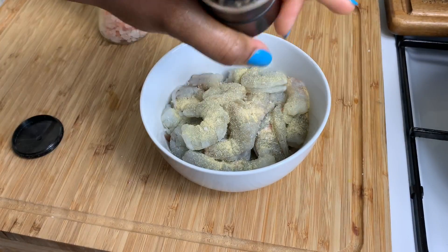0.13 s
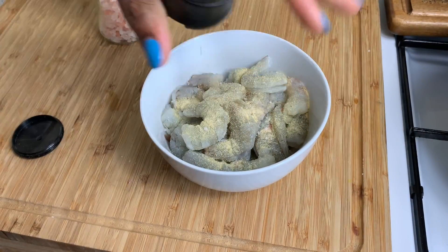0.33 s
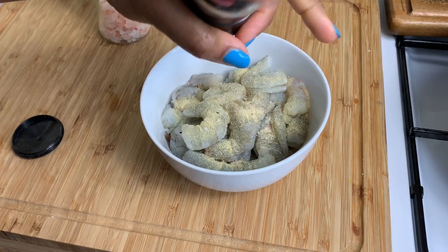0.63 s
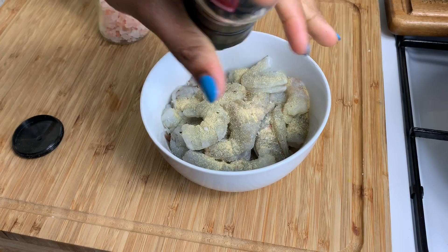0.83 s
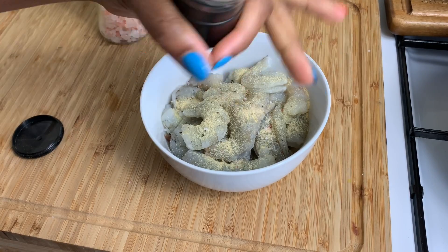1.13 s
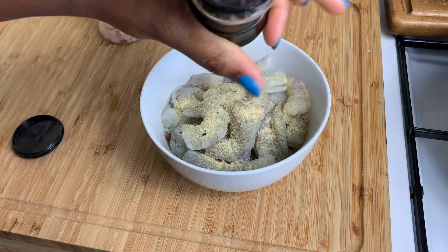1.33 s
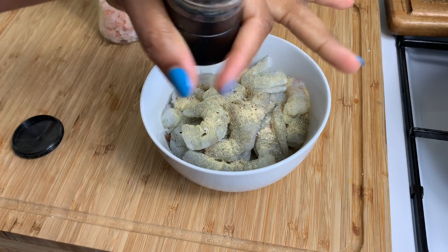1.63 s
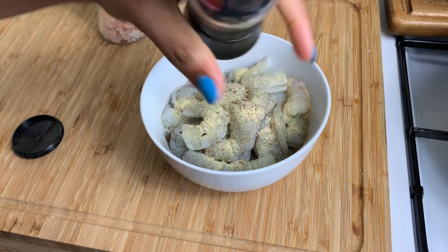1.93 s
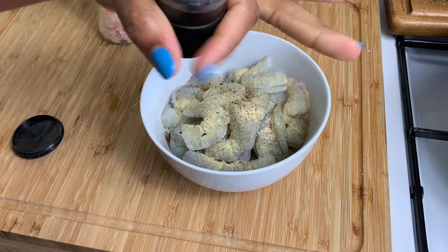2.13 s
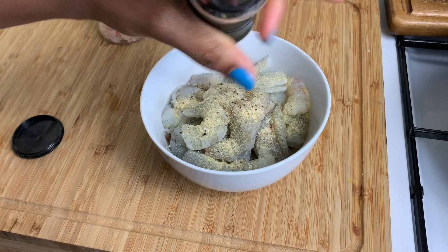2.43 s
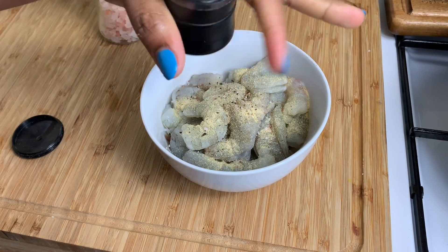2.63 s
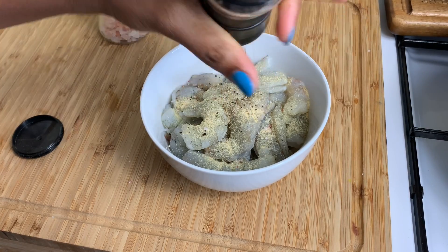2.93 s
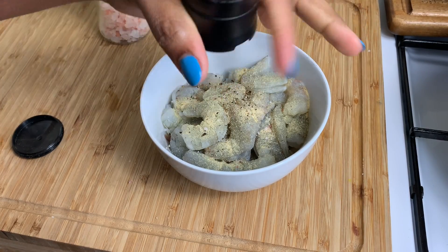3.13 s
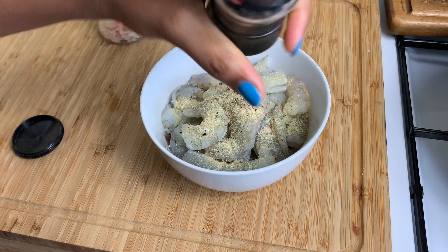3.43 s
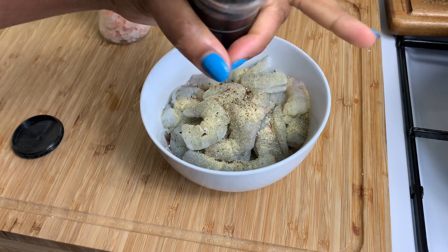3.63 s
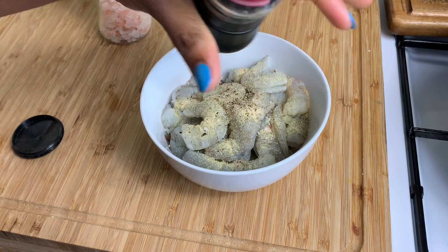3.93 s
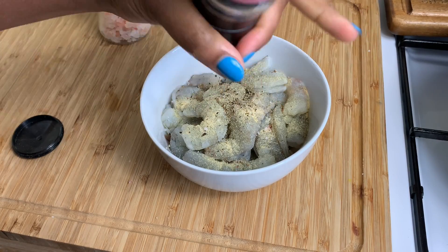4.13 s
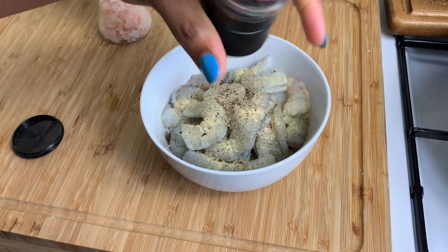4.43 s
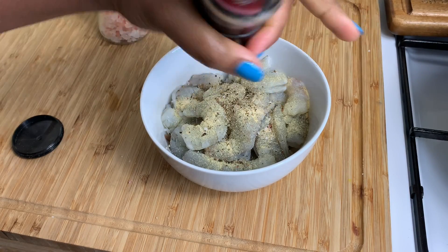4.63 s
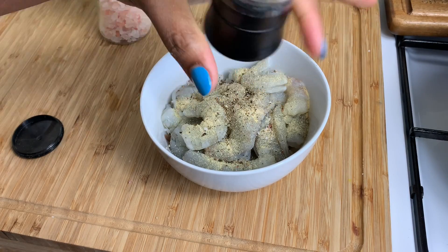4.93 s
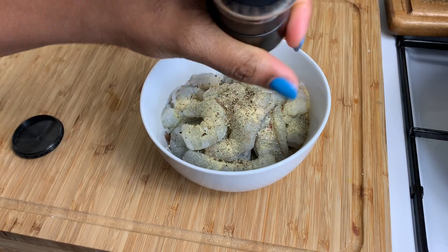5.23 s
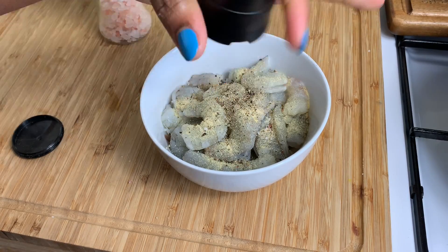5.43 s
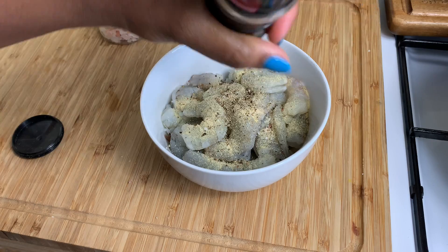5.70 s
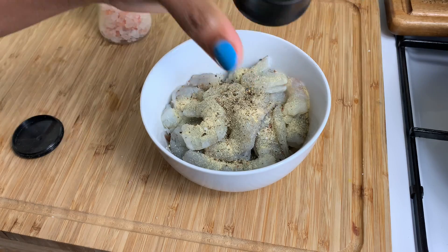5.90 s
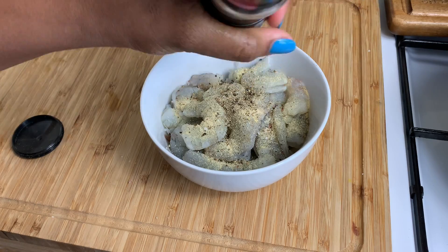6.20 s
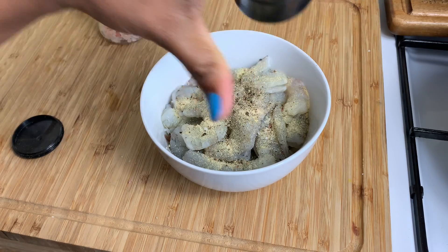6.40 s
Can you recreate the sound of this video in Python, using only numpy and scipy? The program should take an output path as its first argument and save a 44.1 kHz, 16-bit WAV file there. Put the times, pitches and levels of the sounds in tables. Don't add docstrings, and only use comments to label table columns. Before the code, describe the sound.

Very close, a small pepper mill is twisted by hand about twice a second. Each turn is a brief, dry, bright crunch with one or several sharp cracks and a hollow plastic knock, plus a low handling rumble. Between turns crumbs settle and loose corns tick or rattle faintly. Behind it, a kitchen appliance hums and whines quietly and steadily. Close stereo pickup in a small room.

```python
import sys
import numpy as np
from scipy import signal
from scipy.fft import rfft, irfft
from scipy.io import wavfile

SR = 44100
rng = np.random.default_rng(int(sys.argv[2]) if len(sys.argv) > 2 else 0)


def inscribe(sig):
    pcm = np.round(np.clip(np.atleast_2d(sig).T, -1, 1) * 32767)
    wavfile.write(sys.argv[1], SR, pcm.astype(np.int16))


def invert_db(level):
    return 10 ** (np.asarray(level, dtype=float) / 20)


N = 289352

# start t/s, length t/s, grit at the bite level/dB, grit at the end level/dB,
# body ring relative to the grit level/dB
TWISTS = [(0.0, 0.0055, -29, -36.5, -10), (0.084, 0.13, -29, -45, -6), (0.676, 0.06, -29.5, -41, -3.5),
          (1.172, 0.11, -41, -30, -3), (1.739, 0.083, -29.5, -31, -4.5), (2.259, 0.11, -33, -33, -4.5),
          (2.78, 0.11, -34, -37, -3.5), (3.261, 0.092, -31, -33, -3.5), (3.725, 0.096, -29.5, -37, -4),
          (4.183, 0.073, -34.5, -34.5, -5.5), (4.634, 0.2, -34.5, -47.5, -3),
          (5.128, 0.082, -32, -32, -4.5), (5.656, .11, -41, -30, -2), (6.179, 0.098, -31.5, -39, -4)]
# start t/s, length t/s, first grit level/dB, last grit level/dB,
# body ring relative to the grit level/dB
REGRIPS = [
    (0.302, 0.033, -44.5, -50, -15),
    (0.847, 0.079, -47.5, -41.5, -1.5),
    (1.417, 0.022, -43, -48, -5),
    (2.491, 0.03, -53.5, -50, 1),
    (2.624, 0.077, -51.5, -50.5, -14),
    (3.499, .05, -49, -49, -13),
    (3.93, .04, -45, -59, -5),
    (4.412, 0.03, -43.5, -46, 0.5),
    (5.33, 0.013, -49.5, -49.5, 0),
]
# t/s, peak level/dB, body knock relative level/dB, crumbling t60 t/s
CRACKS = [(0.0881, -12.5, -16, 0.035), (0.0907, -5.5, -14.5, 0.051), (0.6544, -6, -10, 0.04),
          (.663, -5.5, -18, 0.057), (0.735, -13, -8.5, 0.032), (1.1538, -14.5, -37, .057),
          (1.1953, -21, -10, 0.24), (1.7303, -12, -13.5, 0.014), (1.7421, -25, -24, .026),
          (2.2597, -13, -47, 0.065), (2.298, -14.5, -6.5, 0.035), (2.7917, -20, -10.5, 0.2),
          (2.828, -12, -11.5, 0.017), (2.8696, -15, -10.5, 0.05), (3.2442, -24, -15, 0.064),
          (3.2864, -19, -34, .044), (3.2982, -3.5, -13, 0.052), (3.714, -18.5, -12, .041),
          (3.716, -7.5, -11, 0.03), (3.7292, -4, -10, 0.02), (4.1321, -18.5, -17, 0.058),
          (4.2163, -17.5, -4, 0.067), (4.2604, -19, -5, 0.077), (4.6169, -17.5, -13.5, .036),
          (4.6903, -2.5, -10, 0.042), (4.7098, -9.5, -20, .016), (5.643, -19, -23, 0.043),
          (5.6767, -23, -27, 0.17), (5.759, -21, -11, 0.053)]
# t/s, peak level/dB, body knock relative level/dB, brightness tilt level/dB
CHIPS = [(0.0508, -27.5, -22, 6), (.066, -35, -35, 5), (0.6427, -29, -31, 6.5), (1.249, -23, -15, -1),
         (1.4275, -31.5, -4, 2), (1.699, -34, -13, 3), (1.7157, -30, -28, 1), (1.797, -23, -36, 3.5),
         (2.2465, -26, -32, 5), (2.7664, -29.5, -12, 3), (2.7763, -40, -33, 2), (3.7068, -28, -36, 3),
         (4.171, -28, -9, -1), (4.1815, -29, -9.5, 1), (4.212, -29, -14, 9), (4.3106, -40, -13, 2),
         (4.6608, -36.5, -11, -12), (4.7835, -38, -25, 2), (5.1078, -37, -17, 4), (5.1225, -39, -20, -7.5),
         (5.1963, -27, -13, 3.5), (5.3382, -23, -23, 10), (5.7285, -21.5, -20, 3.5), (5.7737, -25, -19, -6),
         (5.838, -34.5, -21, 3), (6.159, -28, -11, 1), (6.17, -30, -17, -2), (6.187, -23, -18, 4),
         (6.211, -30, -10, 5), (6.2789, -20, -31, 5.5)]
# t/s, peak level/dB
TICKS = [(0.379, -48), (.3356, -39), (.848, -45), (.8861, -42), (.9186, -37), (.9447, -38), (1.5728, -47),
         (2.5204, -45), (2.66, -39), (3.0155, -51), (3.1448, -41), (3.192, -41), (3.49, -44), (3.517, -40),
         (3.5274, -40), (3.962, -43), (4.411, -42), (4.4227, -37.5), (4.586, -44), (5.2709, -42),
         (5.4186, -47), (5.4912, -57), (5.9339, -61), (5.9723, -49)]
# t/s, peak level/dB, brightness relative level/dB
SLIPS = [(.6778, -29, 8), (.7056, -14, -13), (.731, -20.5, -2), (1.2072, -18, -11), (1.2323, -12, -4),
         (1.267, -39, 7), (1.2828, -35, -6), (1.761, -37, -2), (2.3294, -24, -11), (2.3531, -24.5, -7),
         (3.27, -50, 12), (3.3416, -28, 11), (3.7786, -26.5, -6), (3.8033, -32.5, 15.5), (4.2067, -31, -7),
         (4.6395, -23, 5), (4.6603, -41, 2), (5.1524, -38, 15), (5.19, -38, 3), (6.2358, -18, -2),
         (6.2614, -38, 13)]
# f/Hz, density level/dB
GRIT_COLOUR = [(2200, -7), (3300, -4.5), (4800, -6), (6500, -1), (9000, -0.5), (13000, -2.5), (15000, -5.5),
               (16900, -20)]
# f/Hz, width f/Hz, level/dB
BODY_MODES = [(360, 215, -12.5), (856, 144, -13), (1266, 397, -2.5), (1766, 540, -3.5), (2192, 170, -2.5),
              (2800, 330, -13.5)]
# time of most pressure t/s, rumble level/dB
SQUEEZES = [(.12, -50.5), (.27, -62), (.44, -54), (.67, -43.5), (.88, -52), (1.0, -57.5), (1.27, -45),
            (1.44, -57.5), (1.76, -46), (2.0, -55), (2.29, -52), (2.349, -40), (2.8, -51.5), (2.889, -49),
            (3.08, -62), (3.33, -50.5), (3.75, -46.5), (3.81, -47), (3.98, -55.5), (4.15, -53), (4.22, -46),
            (4.47, -57), (4.71, -42.5), (5.21, -47.5), (5.66, -56), (5.758, -46.5), (6.17, -59),
            (6.27, -48)]
# f/Hz, density level/dB
AIR_COLOUR = [(25, -16), (50, 11), (110, -11.5), (250, -12.5), (500, -14), (1100, -14.5), (1700, -11.5),
              (2600, -20), (4200, -14), (6000, -32.5), (7700, -57), (8200, -64), (13000, -10),
              (15500, -24.5), (16900, -44)]
# f/Hz, width f/Hz, level/dB
WHINE = [(885, 30, -70.5), (1103, 54, -63), (1264, 45, -61), (1422, 79, -56), (2146, 15, -72.5),
         (4450, 110, -94), (7260, 200, -102), (8600, 240, -58), (9495, 240, -54), (10930, 88, -55),
         (10760, 1050, -59), (11860, 270, -55.5)]
# f/Hz, left-right likeness (0 to 1), left minus right level/dB
PORTS = [(50.3, 0.98, -1.5), (290, 0.79, 3), (537, 0.19, 1.5), (1530, 0.49, 2.5), (3200, 0.47, 0.5),
         (5500, 0.051, -2.5), (7100, 0.69, -0.5), (8000, 0.94, 1), (16000, .998, -0.5)]
# f/Hz, level/dB
RECORDER_TOP = [(15850, 0), (15960, -14), (16600, -15), (16950, -40)]

BITE_DB_PER_S, STOP_DB_PER_S = 624, 450
SETTLE_DB, SETTLE_DB_PER_S, REST_DB = -49, 37, -58.5
CHIP_T60_S, CRACK_TILT_DB = 0.031, 2.4
TICK_KNOCK_DB, TICK_TILT_DB, TICK_T60_S = -22, 8.5, 0.04
SNAP_DB, SNAP_LATE_S = 4, 0.0006
SHADE_DB, SHADE_PER_S = 3, 15
PRESS_DB_PER_S, EASE_DB_PER_S, HOLD_DB = 235, 146, -66
KITCHEN_T60_S, KITCHEN_DB = 0.26, -5.5
AIR_DB = -55
WAVER_DB, WAVER_PER_S = 1.1, 9
PORT_LAG_S, PORT_TURN_RAD = 0.000206, 1.58
PORT_BLEND_HZ = 5630
MILL_LAG_S, ROOM_LAG_S = -0.00015, 0.00019


def mill(grit_db, ring_db):
    at, db, knock_db, t60, tilt_db = breaks()
    slip_at, slip_db, bright_db = np.transpose(SLIPS)
    slip_t60 = np.full(len(SLIPS), 0.015)

    knocks = blows(at, db + knock_db + 17.5, t60) + blows(slip_at, slip_db + 13.0, slip_t60)
    rub = splinters(per_s=250, spread_db=8.0, t60=0.05, smooth=0.91)
    knocks += invert_db(grit_db + ring_db + 3.5) * rub
    ringing = body(in_kitchen(knocks, KITCHEN_T60_S))

    edges_hz = [1500, 3800, 5800, 8500, 12000, 18000]
    tint_db = 2.7 * rng.standard_normal((len(at), len(edges_hz)))
    bright = 0
    for k, band_hz in enumerate(zip(edges_hz, edges_hz[1:])):
        band_db = db + tint_db[:, k] + tilt_db * (k - 2)
        sharp = blows(at, band_db + 5.5, t60) + blows(slip_at, slip_db + bright_db, slip_t60)
        unsteady = invert_db(grit_db - 2.0 + 0.5 * drift(54))
        grit = unsteady * splinters(per_s=530, spread_db=5.0, t60=0.0031, smooth=0.68)
        crushed = in_kitchen(sharp + grit, 0.54 * KITCHEN_T60_S) + snaps(at, band_db)
        passing = signal.butter(2, band_hz, "band", fs=SR, output="sos")
        bright += signal.sosfilt(passing, colour(crushed, GRIT_COLOUR))
    return ringing + shading(bright)


def turning():
    t = np.arange(N) / SR
    start, length, bite_db, end_db, ring_db = np.transpose(TWISTS + REGRIPS)[:, :, None]
    run_db = bite_db + (end_db - bite_db) * np.clip((t - start) / length, 0, 1)
    late = np.maximum(t - start - length, 0)
    early_db = BITE_DB_PER_S * np.maximum(start - t, 0)
    settle_db = np.minimum(SETTLE_DB, end_db - 7.5) - SETTLE_DB_PER_S * late
    levels_db = np.maximum(run_db - STOP_DB_PER_S * late, settle_db) - early_db
    loudest = levels_db.argmax(axis=0)
    return np.maximum(levels_db.max(axis=0), REST_DB), ring_db[loudest, 0]


def breaks():
    cracks = [(*row, CRACK_TILT_DB) for row in CRACKS]
    chips = [(s, db, knock, CHIP_T60_S, tilt) for s, db, knock, tilt in CHIPS]
    ticks = [(s, db, TICK_KNOCK_DB, TICK_T60_S, TICK_TILT_DB) for s, db in TICKS]
    return np.transpose(cracks + chips + ticks)


def blows(times, peaks_db, t60s):
    out = np.zeros(N)
    age = np.arange(SR // 8) / SR
    rise = 1 - np.exp(-age / 0.00064)
    for s, db, t60 in zip(times, peaks_db, t60s):
        crumbling = 0.11 * invert_db(-60 * age / np.clip(t60, 0.004, 0.2))
        shape = rise * (invert_db(-60 * age / 0.0046) + crumbling)
        i = round(s * SR)
        out[i:i + len(age)] += invert_db(db) * shape[:N - i]
    return out


def snaps(times, peaks_db):
    out = np.zeros(N)
    np.add.at(out, ((times + SNAP_LATE_S) * SR).astype(int), invert_db(peaks_db + SNAP_DB))
    return out


def splinters(per_s, spread_db, t60, smooth):
    sizes = invert_db(spread_db * np.minimum(rng.exponential(1, N), 3))
    splits = sizes * (rng.random(N) < per_s / SR)
    return rms_one(rms_one(dying(splits, t60)) + smooth)


def dying(clicks, t60):
    return signal.lfilter([1], [1, -invert_db(-60 / (t60 * SR))], clicks + 1e-18)


def body(x):
    return sum(invert_db(db + 4.2 * drift(29)) * resonate(x, hz, width_hz) for hz, width_hz, db in BODY_MODES)


def shading(x):
    hz = np.fft.rfftfreq(N, 1 / SR)
    place = np.clip(4 * np.log2(hz / 2200 + 1e-9), 0, 8)
    spectrum = rfft(x)
    out = 0
    for k in range(9):
        band = irfft(spectrum * np.maximum(1 - abs(place - k), 0), N)
        out = out + invert_db(SHADE_DB * drift(SHADE_PER_S) * (k < 8)) * band
    return out


def grip(rumble_db):
    low = signal.sosfilt(signal.butter(1, [40, 110], "band", fs=SR, output="sos"), noise())
    low = signal.sosfilt(signal.butter(2, 35, "high", fs=SR, output="sos"), low)
    return invert_db(rumble_db - 1.5 + 2.5 * drift(25)) * rms_one(low)


def pressure():
    at, db = np.transpose(SQUEEZES)[:, :, None]
    age = np.arange(N) / SR - at
    fall_db = np.maximum(EASE_DB_PER_S * age, -PRESS_DB_PER_S * age)
    return np.maximum((db - fall_db).max(axis=0), HOLD_DB)


def in_kitchen(envelope, t60):
    keep = invert_db(-120 / (t60 * SR))
    power = signal.lfilter([1 - keep], [1, -keep], envelope ** 2 + 1e-18)
    spiky = rms_one(noise() * invert_db(3.94 * rng.standard_normal(N)))
    return envelope * spiky + invert_db(KITCHEN_DB) * np.sqrt(power) * noise()


def appliance():
    out = invert_db(AIR_DB) * rms_one(colour(noise(), AIR_COLOUR))
    white = noise()
    for hz, width_hz, db in WHINE:
        wide = 1.53 * width_hz
        whine = rms_one(resonate(resonate(white, hz, width_hz), hz, wide))
        out = out + invert_db(db + WAVER_DB * drift(WAVER_PER_S)) * whine
    return out


def noise():
    return rng.standard_normal((2, N))


def drift(rate):
    r = np.exp(-2 * np.pi * rate / SR)
    return rms_one(signal.lfilter([1], [1, -2 * r, r * r], rng.standard_normal(N + SR))[SR:])


def resonate(x, hz, width_hz):
    r = np.exp(-np.pi * width_hz / SR)
    poles = [1, -2 * r * np.cos(2 * np.pi * hz / SR), r * r]
    return signal.lfilter(np.array([1, 0, -1]) * (1 - r * r) / 2, poles, x)


def colour(x, spectrum):
    return irfft(rfft(x) * invert_db(at_hz(spectrum, np.fft.rfftfreq(N, 1 / SR))), N)


def at_hz(points, hz, column=1):
    rows = np.array(points)
    return np.interp(np.log(hz + 1e-9), np.log(rows[:, 0]), rows[:, column])


def rms_one(x):
    return x / np.sqrt(np.mean(x ** 2) + 1e-20)


def ports(waves, nearness, low_lag_s, low_alike):
    hz = np.fft.rfftfreq(N, 1 / SR)
    high = 1 / (1 + (PORT_BLEND_HZ / (hz + 1)) ** 12)
    alike = np.clip(at_hz(PORTS, hz) * (high + low_alike * (1 - high)), 0, 1)
    tilt_db = nearness * at_hz(PORTS, hz, column=2)
    high_lag = np.exp(1j * (PORT_TURN_RAD - 2 * np.pi * hz * PORT_LAG_S))
    low_lag = np.exp(-2j * np.pi * hz * low_lag_s)
    lag = high * high_lag + (1 - high) * low_lag
    shared, scattered = rfft(waves)
    left = alike * lag / abs(lag) * shared + np.sqrt(1 - alike ** 2) * scattered
    return irfft([invert_db(tilt_db / 2) * left, invert_db(-tilt_db / 2) * shared], N)


def scene():
    near = mill(*turning()) + grip(pressure())
    close = ports(near, nearness=1.4, low_lag_s=MILL_LAG_S, low_alike=0.99)
    far = ports(appliance(), nearness=-0.38, low_lag_s=ROOM_LAG_S, low_alike=0.94)
    return close + far


def roll_off(x):
    return signal.sosfilt(signal.butter(12, 16970, fs=SR, output="sos"), x)


def record(dry):
    dry = signal.sosfilt(signal.butter(2, 30, "high", fs=SR, output="sos"), dry)
    rounded = colour(1.1 * np.tanh(dry / 1.1), RECORDER_TOP)
    cut = signal.sosfilt(signal.cheby2(10, 60, 17300, fs=SR, output="sos"), rounded)
    return roll_off(cut)


dry = scene()
out = record(dry)
inscribe(out)
```